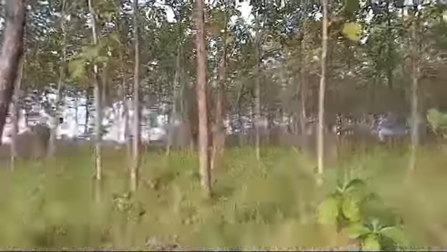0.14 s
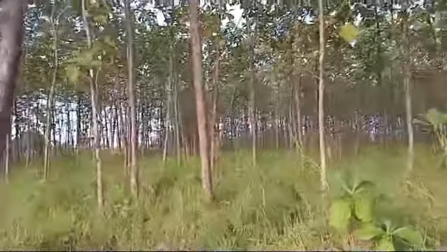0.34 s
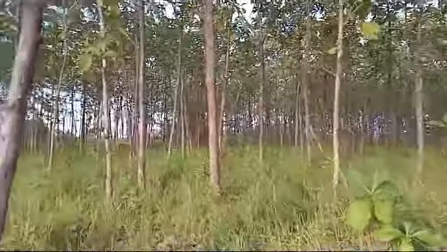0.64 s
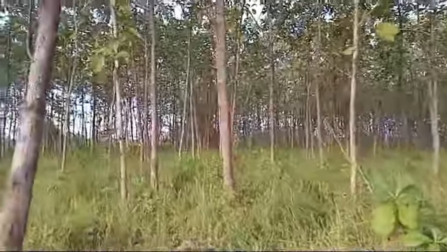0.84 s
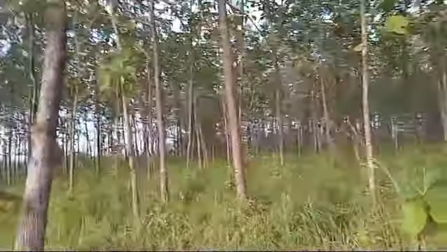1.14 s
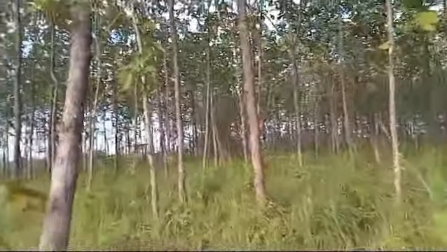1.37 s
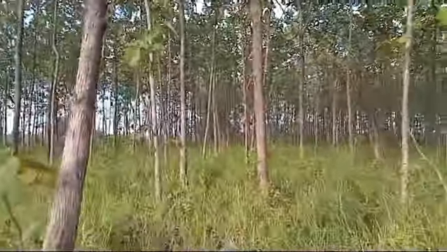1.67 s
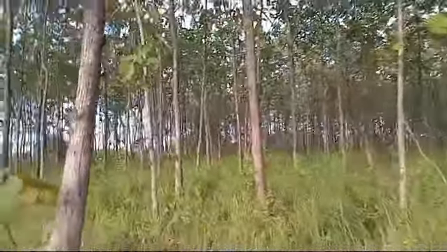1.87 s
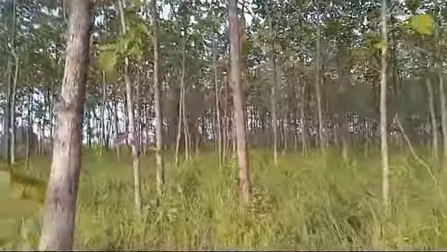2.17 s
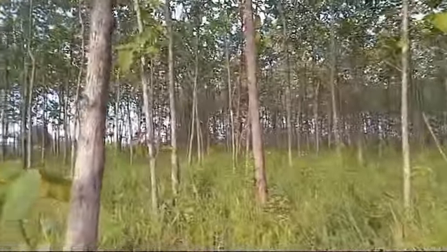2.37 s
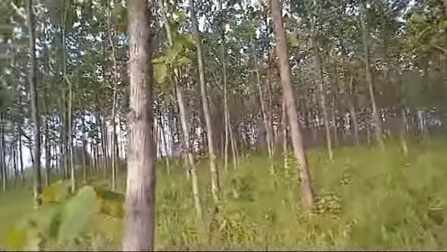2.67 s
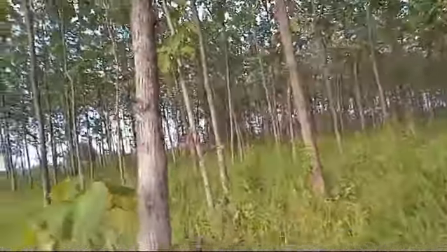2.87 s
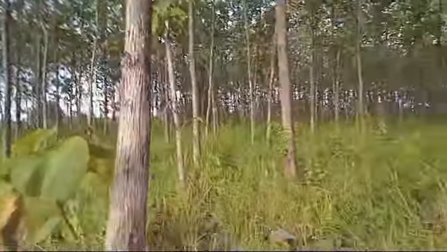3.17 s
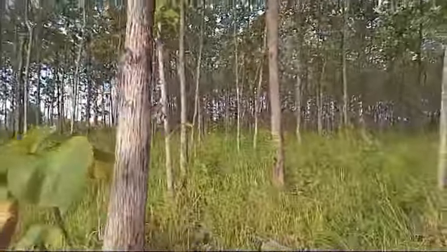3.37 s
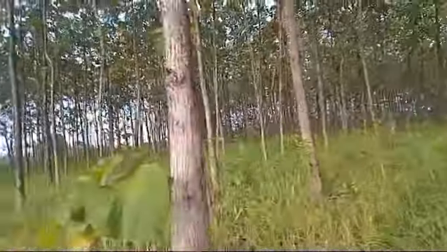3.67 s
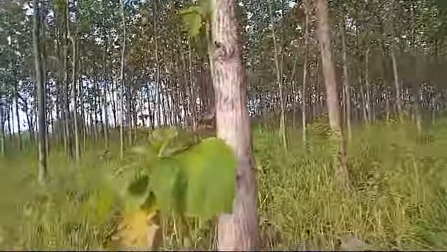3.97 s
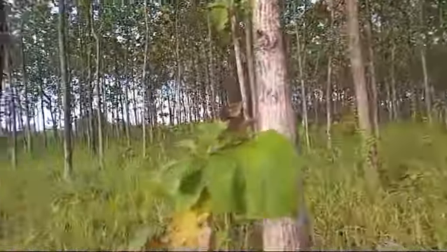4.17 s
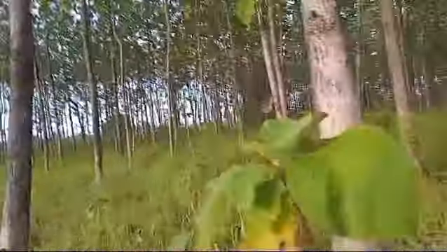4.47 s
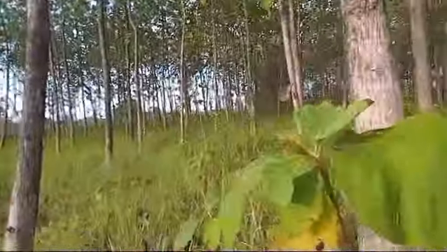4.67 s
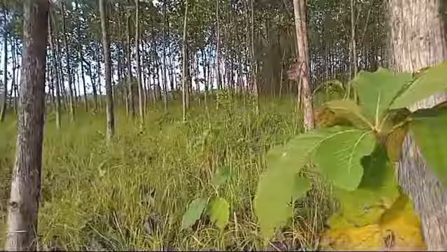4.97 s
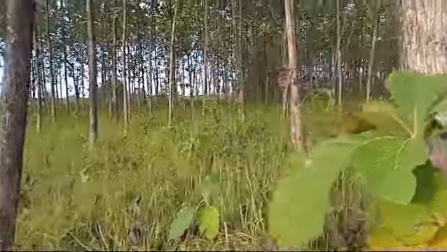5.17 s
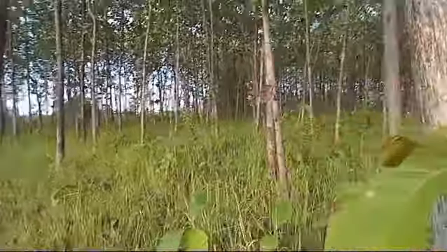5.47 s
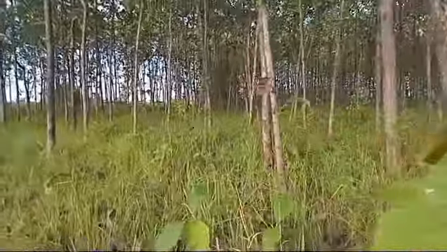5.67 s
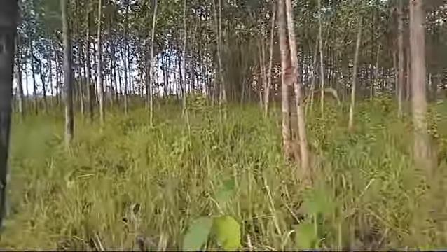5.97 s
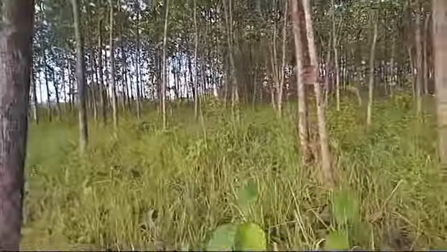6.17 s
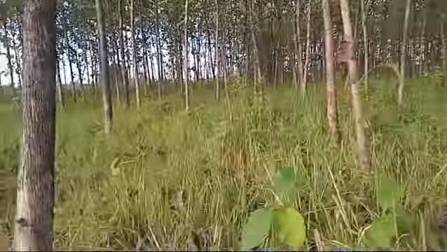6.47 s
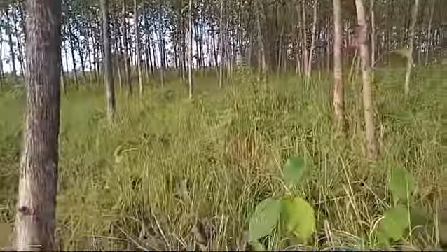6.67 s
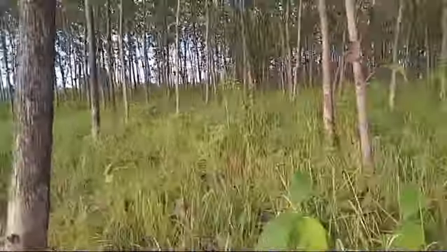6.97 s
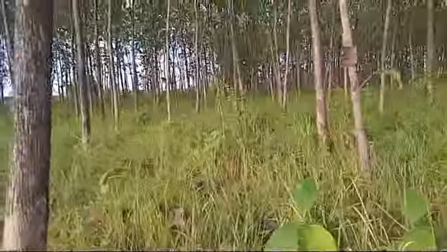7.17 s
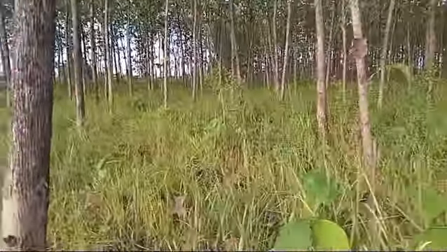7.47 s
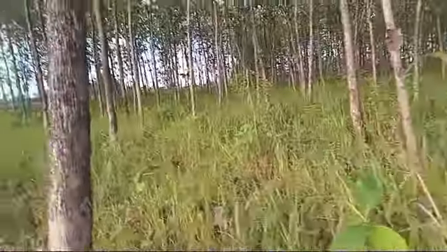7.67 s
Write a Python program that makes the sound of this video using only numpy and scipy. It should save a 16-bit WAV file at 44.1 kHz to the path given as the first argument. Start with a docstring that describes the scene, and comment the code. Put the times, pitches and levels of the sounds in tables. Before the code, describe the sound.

Outdoors among thin trees, small birds give falling whistles and harsh short chirps, softened by woodland echo. Near the microphone, legs sweep dry grass: light rustles at first, a sharp crackling footfall on dead leaves, a woody snap, then soft thuds and a final brittle crunch. Tiny dry insect ticks appear now and then. Gusts make a deep, dull rumble that eases later, with faint high hiss beneath.

```python
"""Slow steps through long dry grass in a young wood: each swish is a mass of tiny fractures over sliding hiss.
Single stems, crushed leaves and a twig break as bursts of noise, some ringing through short damped modes.
Small birds call in gliding sine tones with rough side tones, and a wash of echoes spreads among the trunks.
Dry insect ticks are bursts of filtered noise; a faint drone comes and goes, wind rumbles on the microphone,
and a faint high hiss around 9.5-11 kHz, probably the microphone's own noise, lies beneath."""
import sys
import numpy as np
from scipy import signal
from scipy.fft import rfft, irfft, next_fast_len
from scipy.io import wavfile
from scipy.ndimage import uniform_filter1d

SR = 44100
rng = np.random.default_rng(int(sys.argv[2]) if len(sys.argv) > 2 else 0)


def wav_out(sig):
    """Save sig, one row per channel (or a flat mono array), as 16-bit PCM at SR to the path in sys.argv[1]."""
    wavfile.write(sys.argv[1], SR, np.round(np.clip(np.atleast_2d(sig).T, -1, 1) * 32767).astype(np.int16))


N = 345303
T = np.arange(N) / SR


def undb(db):
    """Decibels to amplitude gain."""
    return 10 ** (np.asarray(db) / 20)


def unit(x):
    """Scale to rms 1."""
    return x / np.sqrt(np.mean(x ** 2) + 1e-30)


def unit_burst(x):
    """Scale a short sound to the energy of 4 ms at rms 1."""
    return x / np.sqrt(np.sum(x ** 2) / (.004 * SR))


def curve(points):
    """Draw straight lines over time through (time, value) points."""
    return np.interp(T, *np.transpose(points))


def add(out, start_s, x):
    """Mix x into out at start_s."""
    i = max(int(start_s * SR), 0)
    out[i:i + len(x)] += x[:max(N - i, 0)]


def colour(x, points):
    """Causal, minimum-phase filter through (Hz, dB) points; white noise keeps its power."""
    hz, db = np.transpose(points)
    size = 8192
    bins_hz = np.fft.rfftfreq(size, 1 / SR)
    gain = unit(undb(np.interp(np.log(bins_hz + 1), np.log(hz), db)))
    # folding the cepstrum forward puts the whole response after the input
    cepstrum = irfft(np.log(gain))
    cepstrum[1:size // 2] *= 2
    cepstrum[size // 2 + 1:] = 0
    return signal.fftconvolve(x, irfft(np.exp(rfft(cepstrum))))[:N]


def walk(rate_hz):
    """Random wander through rate_hz new values a second, with spread near 1."""
    knots = rng.standard_normal(8192)
    return np.interp(T * rate_hz, np.arange(len(knots)), knots)


def burst(decay_s, tail_db=-60, tail_s=0.014):
    """A fracture: a sharp flurry of noise, then weaker splinters of random strength."""
    t = T[:SR // 8]
    splinter_times = t[::40]
    splinter_sizes = rng.exponential(size=len(splinter_times)) ** 1.5 / 2
    splinters = np.interp(t, splinter_times, splinter_sizes)
    force = np.exp(-t / decay_s) + undb(tail_db) * splinters * np.exp(-t / tail_s)
    return unit_burst(rng.standard_normal(len(t)) * force)


def ring(hz, width_hz):
    """A damped mode with gain 1 at its centre."""
    t = T[:SR // 8]
    decay = np.exp(-np.pi * width_hz * t)
    return 2 * np.pi * width_hz / SR * decay * np.sin(2 * np.pi * hz * t)


# balance of sliding hiss against breaking stalks: time_s, hiss_over_crackle_power [ratio]
SLIDE_BALANCE = [(0, 1.4), (3.4, 1.1), (5.5, 0.67), (5.9, 2.7), (6.8, 4.4), (7.2, 21), (7.5, 5.2),
                 (7.65, 4.5), (7.8, 1.8)]
# gain of the swishes' treble above 9 kHz: time_s, gain_db
TREBLE_GAIN = [(0.8, 2), (1.8, -0.5), (3.4, 0.5), (4.2, 4), (5.2, -2), (6.85, 12), (7.3, 4), (7.47, -21),
               (7.55, -6.5)]
# crisp tone of breaking stalks: frequency_hz, relative_level_db [dB per Hz]
CRACKLE_COLOUR = [(1200, -21), (2400, -4.5), (3300, 0.5), (5000, 0.5), (6500, 0.5), (7900, -2), (9800, 7.5),
                  (11100, 3), (11800, -5), (15500, -13)]
# hollow tone of crushed litter: frequency_hz, relative_level_db [dB per Hz]
LITTER_COLOUR = [(150, -26.5), (350, -21), (550, -22.5), (800, -5.5), (1150, 0.5), (1900, 2.5), (2800, 1),
                 (5000, -22.5)]


def grass(per_s=420, patchy_db=4.0, leaf_db=6.5, crackle_db=-3.0, litter_db=-3.5):
    """Stalks break in tiny flurries of very unequal size and set leaves ringing, over the hiss of sliding blades."""
    spread_db, grain_s, rings_db = 4.5, .0009, -3
    sizes_db = spread_db * np.minimum(rng.exponential(size=N), 3.5)
    breaks = (rng.random(N) < per_s / SR) * undb(sizes_db)
    slide = curve(SLIDE_BALANCE)
    # the more the blades slide, the smoother the texture
    smooth = np.sqrt(1 + slide)
    clumps = undb(patchy_db * walk(70) / smooth)
    rings = undb(rings_db) * leaf_rings() / smooth
    out = 0
    for layer, trim_db, points in (("crackle", crackle_db, CRACKLE_COLOUR), ("litter", litter_db, LITTER_COLOUR)):
        # every break has its own balance of crisp and hollow
        hits = breaks * undb(2 * rng.standard_normal(N))
        power = signal.lfilter([1], [1, -np.exp(-2 / (grain_s * SR))], hits ** 2)
        force = np.sqrt((power / power.mean() + slide) / (1 + slide))
        texture = force * leaves(leaf_db / smooth) + rings
        out = out + colour(texture * clumps * swish_gain(layer) * undb(trim_db), points)
    treble = signal.sosfiltfilt(signal.butter(2, 9000, "high", fs=SR, output="sos"), out)
    return out + treble * (undb(curve(TREBLE_GAIN)) - 1)


# a leg or foot sweeps the grass; levels are relative, the litter's is for below 2.4 kHz:
# start_s, attack_s, length_s, crackle_level_db, litter_level_db
SWISHES = [(0.033, 0.011, 0.16, -72, -76.5), (0.736, 0.03, 0.061, -45.5, -62.5),
           (0.806, .01, 0.083, -46.5, -58), (0.923, .015, 0.13, -59, -78.5),
           (1.741, 0.015, 0.093, -49.5, -65.5), (2.001, 0.019, 0.036, -49, -66),
           (2.596, 0.014, 0.16, -60, -76), (3.276, 0.013, 0.14, -51, -57.5),
           (3.374, 0.0068, 0.11, -41.5, -45.5), (3.528, 0.017, 0.1, -59.5, -67.5),
           (3.666, 0.008, 0.043, -59, -67), (3.987, 0.018, 0.066, -59, -88),
           (4.067, 0.0098, 0.063, -50, -58.5), (4.161, 0.02, 0.072, -50, -52.5),
           (4.257, 0.0043, 0.054, -50.5, -61.5), (4.415, .012, 0.062, -60.5, -61),
           (4.533, 0.028, 0.12, -66.5, -74), (4.961, 0.033, 0.045, -64, -85),
           (5.145, 0.011, 0.068, -52.5, -66.5), (5.528, 0.0074, 0.02, -62, -66.5),
           (5.812, 0.06, 0.13, -64.5, -70), (5.977, 0.016, 0.18, -72, -74),
           (6.775, 0.0025, 0.099, -51, -55), (7.071, 0.023, 0.12, -61.5, -56), (7.143, 0.02, 0.1, -50, -58),
           (7.249, 0.013, 0.074, -48.5, -59), (7.362, 0.016, 0.059, -52.5, -72),
           (7.414, 0.015, 0.087, -46, -73), (7.524, 0.0053, 0.055, -32, -42),
           (7.599, 0.01, 0.048, -39, -45), (7.674, 0.016, 0.13, -54.5, -82)]


def swish_gain(layer, arch_db=1, settle_s=0.024):
    """Strength of the swishes in one layer; each builds, swells and dies away as the stalks settle."""
    power, lead_s = np.zeros(N), .03
    t = T[:SR] - lead_s
    for start_s, attack_s, length_s, crackle_db, litter_db in SWISHES:
        level_db = crackle_db if layer == "crackle" else litter_db
        attack = (1 + np.tanh(t / attack_s - .5)) / 2
        swell_db = arch_db * (np.sin(np.pi * np.clip(t / length_s, 0, 1)) - .5)
        settle = np.exp(-np.maximum(t - length_s, 0) / settle_s)
        add(power, start_s - lead_s, (undb(level_db + swell_db) * attack * settle) ** 2)
    return np.sqrt(power)


def leaves(spread_db):
    """Noise whose bands flicker apart, as one leaf after another rings at its own pitch."""
    size = next_fast_len(N)
    spectrum, hz = rfft(rng.standard_normal(size)), np.fft.rfftfreq(size, 1 / SR)
    band = np.searchsorted(np.geomspace(600, 13000, 20), hz)
    out = np.zeros(N)
    for k in range(band.max() + 1):
        band_noise = irfft(spectrum * (band == k), size)[:N]
        out += band_noise * undb(spread_db * walk(45))
    return unit(out)


def leaf_rings():
    """Curled dry leaves ring for a few milliseconds, each at its own pitch and strength."""
    per_s, width_hz, spread_db = 800, 240, 5
    out, t = np.zeros(N), T[:SR // 60]
    for when, pitch, damping, size in rng.random((int(per_s * N / SR), 4)):
        hz = 800 * 9 ** pitch
        level_db = spread_db * min(-np.log(1 - size), 3)
        decay = np.exp(-np.pi * width_hz * (.5 + damping) * t)
        add(out, when * N / SR, undb(level_db) * decay * np.sin(2 * np.pi * hz * t))
    return unit(out)


# dull brush of long blades along a leg: frequency_hz, relative_level_db [dB per Hz]
BRUSH_COLOUR = [(200, -32.5), (400, -1), (650, 6.5), (1000, -3), (1600, -19), (3000, -37)]


def brush(trim_db=-6):
    """Where the blades slide rather than break, they rub the leg with a soft, low hiss."""
    slide = curve(SLIDE_BALANCE)
    rubbing = swish_gain("litter") * (slide / (1 + slide)) ** 2
    return colour(rng.standard_normal(N) * rubbing, BRUSH_COLOUR) * undb(trim_db)


# how much bent grass goes on stirring between steps: time_s, level_db
STIRRING = [(0, -81.5), (1.3, -75), (2.3, -85.5), (3.1, -83.5), (3.9, -84.5), (4.7, -73), (5.6, -83),
            (6.5, -75), (7.83, -64.5)]


def stirring(leaf_db=8.5, waver_db=5.0):
    """Between the steps, bent stalks creep back with a faint, soft rustle."""
    strength = undb(curve(STIRRING) + waver_db * walk(13))
    return colour(leaves(leaf_db) * strength, CRACKLE_COLOUR)


# single stems and leaves breaking, about 1 ms after cue_s: cue_s, relative_treble_db, relative_body_db
SNAPS = [(0.049, -65, -56), (0.2534, -52, -47.5), (0.757, -46, -56), (0.8105, -37.5, -43),
         (0.9008, -41, -58), (1.3395, -45.5, -50.5), (1.7419, -38.5, -62), (1.7813, -34.5, -40),
         (1.8292, -30.5, -47), (2.644, -53, -53.5), (2.712, -41, -75), (3.3882, -29, -30),
         (3.393, -24.5, -45), (3.3998, -25, -26), (3.4135, -17, -26), (3.4319, -27, -42),
         (3.4476, -28, -29), (3.46, -37, -48), (3.4743, -37, -32), (3.491, -31, -51), (3.5132, -37, -44),
         (3.595, -38, -41.5), (3.613, -44, -47), (3.6772, -45.5, -73), (4.024, -47, -68),
         (4.0805, -38, -52), (4.0869, -31.5, -52), (4.194, -38, -47), (4.993, -46, -76),
         (5.342, -54.5, -52), (5.535, -53, -50), (6.105, -49.5, -65), (6.8781, -43, -40),
         (7.0308, -49.5, -59), (7.388, -50, -70), (7.5268, -28.5, -35), (7.605, -43, -36),
         (7.623, -38, -40), (7.628, -32, -47), (7.647, -27, -39), (7.733, -41.5, -75), (7.7627, -44.5, -74),
         (7.7844, -37, -68)]
# whole dry leaves crushed flat: start_s, length_s, treble_level_db, body_level_db
CRUSHES = [(1.819, 0.011, -52.5, -50.5), (2.025, 0.0019, -45, -47), (3.384, 0.0082, -30.5, -31.5),
           (3.392, 0.018, -31, -38.5), (3.411, 0.0031, -26, -32), (3.419, 0.0047, -32.5, -39),
           (3.448, 0.0068, -36, -34), (4.074, 0.039, -46, -54.5), (4.432, 0.031, -78, -60),
           (6.879, 0.073, -49.5, -62), (6.935, 0.024, -58, -58.5), (7.444, 0.022, -62, -62.5),
           (7.532, 0.02, -42, -37.5), (7.568, 0.016, -33, -36.5)]


def snaps(crisp_db=-7, body_db=-9):
    """Thicker stems give way one by one; stiff leaves collapse in a dense run of fractures."""
    crisp, body = np.zeros(N), np.zeros(N)
    for cue_s, treble_db, low_db in SNAPS:
        tick = burst(.001, tail_db=-13, tail_s=.008)
        tock = burst(.0015, tail_db=-13, tail_s=.01)
        add(crisp, cue_s + 0.00088, undb(treble_db + crisp_db) * stem(tick))
        add(body, cue_s + 0.001128, undb(low_db + body_db) * stem(tock))
    for start_s, length_s, treble_db, low_db in CRUSHES:
        u = np.linspace(0, 1, int(length_s * SR))
        arch = np.sqrt(np.abs(np.sin(np.pi * u)))
        force = unit(arch * undb(3 * walk(900)[:len(u)]))
        add(crisp, start_s, undb(treble_db) * force * rng.standard_normal(len(u)))
        add(body, start_s, undb(low_db) * force * rng.standard_normal(len(u)))
    return colour(crisp, CRACKLE_COLOUR) + colour(body, LITTER_COLOUR)


def stem(x):
    """Every stem rings with its own chance colour."""
    hz, spread_db = np.geomspace(700, 15000, 16), 3
    return colour(x, np.transpose([hz, spread_db * rng.standard_normal(len(hz))]))


# thin dry blades flick past each other: start_s, resonance_hz, width_hz, level_db
FLICKS = [(0.047, 11500, 6800, -48.5), (0.737, 9300, 1000, -46), (0.832, 12000, 6000, -40),
          (0.9675, 10150, 1200, -46), (2.871, 11700, 6700, -56), (6.857, 10400, 1800, -39)]


def flicks():
    """Each flick is a brief scrape through the blade's one high resonance."""
    out = np.zeros(N)
    for start_s, hz, width_hz, level_db in FLICKS:
        mode = ring(hz, width_hz)
        scrape = burst(.0018, tail_db=-16)
        x = signal.fftconvolve(signal.fftconvolve(scrape, mode), mode)
        add(out, start_s, undb(level_db) * unit_burst(x))
    return out


# a twig breaks underfoot: start_s, level_db
TWIG_CRACKS = [(4.2666, -24.5), (4.2692, -47.5), (4.2687, -45.5)]
# what the twig rings with: frequency_hz, width_hz, relative_level_db
TWIG_MODES = [(637, 244, -6.5), (970, 400, -1.5), (1500, 390, 2), (3150, 390, 3), (4430, 1860, -6),
              (8900, 5100, -6), (11500, 1570, -1)]


def twig(scatter_db=-27):
    """The twig splits in stages; each one rings its short modes and shakes the litter."""
    out, crack = np.zeros(N), 0
    for k, (hz, width_hz, mode_db) in enumerate(TWIG_MODES):
        # neighbouring modes swing in opposite directions
        crack = crack + (-1) ** k * undb(mode_db) * ring(hz, width_hz)
    crack = unit_burst(crack)
    for start_s, level_db in TWIG_CRACKS:
        add(out, start_s, undb(level_db) * crack)
    scatter = burst(decay_s=0.0035)
    return out + undb(scatter_db) * signal.fftconvolve(out, scatter)[:N]


# dull knocks of a foot on wood and soil: start_s, resonance_hz, scuff_decay_s, relative_level_db
KNOCKS = [(5.535, 660, 0.011, -47.5), (5.925, 865, 0.0059, -63.5), (6.815, 153.4, 0.032, -38.5),
          (6.84, 270, 0.0076, -48.5), (6.945, 730, 0.011, -54)]


def knocks(width=0.44):
    """Soft blows: a brief scuff through one broad, low resonance, its width a share of its pitch."""
    out = np.zeros(N)
    for start_s, hz, decay_s, level_db in KNOCKS:
        mode = ring(hz, width * hz)
        x = signal.fftconvolve(signal.fftconvolve(burst(decay_s), mode), mode)
        add(out, start_s, undb(level_db) * 2 * x / np.abs(x).max())
    return out


# Call tables below: start_s, length_s, pitch_hz, level_db, side_tones_db.
# The arches scale pitch_hz and the swells scale the level; each is one column of ratios at five even moments.
# falling whistles: columns as above
WHISTLES = [(0.213, 0.12, 2990, -73, -20), (0.371, 0.16, 3230, -72, -14), (0.695, 0.12, 3370, -62, -24),
            (1.005, 0.12, 3386, -57.5, -3), (1.32, 0.093, 3440, -61.5, -17), (1.621, 0.1, 3496, -60.5, -11),
            (1.924, 0.096, 3530, -60, -32), (2.248, 0.095, 3400, -62, -36), (2.675, 0.1, 3235, -66, -4),
            (2.72, 0.088, 2890, -60.5, -16), (3.521, 0.10, 3362, -59.5, -6.5),
            (3.802, 0.1, 3060, -62.5, -7), (4.494, 0.11, 3335, -62.5, -13), (4.81, 0.13, 3303, -65, -23.5),
            (5.115, 0.11, 3290, -62.5, -13), (5.25, 0.16, 2890, -67.5, -14), (5.444, 0.086, 3254, -66, -29),
            (6.282, .12, 3174, -67.5, -22.5), (6.6, 0.12, 3240, -77.5, -12), (6.88, 0.11, 3340, -61.5, -12),
            (7.25, 0.065, 3090, -60.5, -19), (7.69, .13, 3300, -82, -1)]
# height over the lowest pitch: share_of_height [ratio]; strength: gain [ratio]
WHISTLE_ARCH = [.96, 1.01, .89, 0.48, .28]
WHISTLE_SWELL = [.45, 0.84, .85, .62, 0.53]
WHISTLE_LOWEST_HZ = 2646
# harsh chirps that slide up, hold and dip at the end: columns as above
CHIRPS = [(1.36, 0.049, 3330, -65.5, 0.5), (2.929, 0.063, 3377, -54.5, -5),
          (3.203, 0.057, 3420, -58.5, -3.5), (3.875, 0.063, 3270, -61.5, -10),
          (5.495, 0.053, 3350, -59, -5), (5.783, 0.046, 3418, -57.5, -5.5),
          (6.087, 0.046, 3347, -60.5, -2.5), (6.38, 0.065, 3250, -63, -0.5),
          (6.69, 0.061, 3430, -67.5, 2.5), (7.0, 0.06, 3250, -73, -3), (7.36, 0.14, 3150, -67, -3.5)]
# pitch_scale [ratio]; gain [ratio]
CHIRP_ARCH = [0.79, .91, 1.0, 1.003, 0.89]
CHIRP_SWELL = [0.27, 0.33, 0.99, 0.89, .5]
# thin, clean calls high in the canopy: columns as above
THIN_CALLS = [(1.09, 0.25, 6980, -67.5, -43), (4.53, 0.21, 6900, -69, -46), (4.78, 0.097, 5150, -81, -46)]
# pitch_scale [ratio]; gain [ratio]
THIN_ARCH = [.965, 0.91, 1.002, 0.89, .996]
THIN_SWELL = [0.47, 0.65, 0.68, 0.74, .3]
# clear, sinking notes from nearer birds: columns as above
CLEAR_CALLS = [(2.41, 0.1, 4090, -59, -39), (1.385, 0.043, 6550, -85, -45), (5.39, .13, 5800, -80, -46)]
# pitch_scale [ratio]; gain [ratio]
CLEAR_ARCH = [.965, 1.006, .978, .955, .925]
CLEAR_SWELL = [.5, 0.77, 0.71, 0.41, .12]


def birds(notes, arch, swell, lowest_hz=0, octave_db=-31, second_voice_db=-4):
    """Gliding notes; harsh ones gain side tones and a lower, less steady voice from the syrinx's other side."""
    out, wobble, waver, flutter = np.zeros(N), walk(400), walk(300), walk(90)
    moments, lower = np.linspace(0, 1, len(arch)), .885
    for start_s, length_s, hz, level_db, side_db in notes:
        u = np.linspace(0, 1, int(length_s * SR))
        here = int(start_s * SR) + np.arange(len(u))
        harsh = undb(side_db)
        bend = uniform_filter1d(np.interp(u, moments, arch), len(u) // 6)
        glide_hz = lowest_hz + (hz - lowest_hz) * bend
        # harsh notes are rougher, and low notes lose steadiness towards the end
        rough = .003 + .014 * harsh + .035 * u ** 2 * (hz < 3800)
        phase = 2 * np.pi * np.cumsum(glide_hz * (1 + rough * wobble[here])) / SR
        second = 2 * np.pi * np.cumsum(lower * hz * (1 + .03 * waver[here])) / SR
        # a slower vibration puts side tones mainly a quarter of the pitch away
        sides = np.sin(5 / 4 * phase) + .1 * np.sin(3 / 4 * phase) + .06 * np.sin(7 / 4 * phase)
        sides += .06 * np.sin(phase / 2) + .12 * np.sin(2 * phase)
        second_voice = np.sin(second) + np.sin(5 / 4 * second) / 2
        force = np.interp(u, moments, swell) * np.interp(u, [0, .1, .9, 1], [0, 1, 1, 0])
        voice = np.sin(phase) + undb(octave_db) * np.sin(2 * phase)
        voice += harsh * force ** 2 * sides + undb(second_voice_db) * harsh * second_voice
        add(out, start_s, np.sqrt(2) * force * undb(2 * flutter[here] + level_db) * voice)
    return out


# falling, trilled notes that end some whistles: start_s, length_s, pitch_hz, level_db
BUZZES = [(0.499, 0.064, 3156, -58.5), (1.055, 0.085, 3240, -60.5), (1.362, 0.068, 3150, -66),
          (1.664, 0.069, 2880, -66)]


def buzzes(trill_hz=340, depth=0.059, rough=0.018, fall=.1):
    """A fast, uneven trill shakes the falling pitch and splits the note into close strands."""
    out, wobble, waver = np.zeros(N), walk(700), walk(60)
    for start_s, length_s, hz, level_db in BUZZES:
        u = np.linspace(0, 1, int(length_s * SR))
        here = int(start_s * SR) + np.arange(len(u))
        trill = np.sin(2 * np.pi * np.cumsum(trill_hz * (1 + .1 * waver[here])) / SR)
        bend = 1 - fall * u ** 2 + depth * trill + rough * wobble[here]
        phase = 2 * np.pi * np.cumsum(hz * bend) / SR
        swell = np.sqrt(2) * np.sin(np.pi * np.sqrt(u))
        add(out, start_s, undb(level_db) * swell * np.sin(phase))
    return out


# short low pips of another bird: start_s, peak_level_db, pitch_hz
PIPS = [(1.153, -62, 1500), (1.27, -61, 1360), (1.3356, -49.5, 1657), (1.432, -63, 1500),
        (1.944, -55.5, 1500), (2.319, -63.5, 1500), (2.64, -58.5, 1556), (2.75, -51, 1500),
        (4.35, -60, 1600), (4.683, -59.5, 1422), (5.08, -65.5, 1470)]


def pips(length_s=0.011, rough=0.062):
    """Very short, low notes, husky because their pitch shakes at random."""
    out, u, wobble = np.zeros(N), np.linspace(0, 1, int(length_s * SR)), walk(900)
    for start_s, level_db, hz in PIPS:
        shake = rough * wobble[int(start_s * SR):][:len(u)]
        phase = 2 * np.pi * np.cumsum(hz * (1 + shake)) / SR
        add(out, start_s, undb(level_db) * np.sin(np.pi * u) ** 2 * np.sin(phase))
    return out


def trunks(x):
    """Scattering among the trees: a dense, slightly uneven wash of echoes builds up and fades."""
    t60_s, buildup_s, clump_db = .5, .014, 1.5
    t = T[:SR]
    fade = undb(-60 * t / t60_s + clump_db * walk(60)[:SR])
    buildup = 1 - np.exp(-(t / buildup_s) ** 2)
    tail = rng.standard_normal(SR) * fade * buildup
    return signal.fftconvolve(x, tail / np.sqrt(np.sum(tail ** 2)))[:N]


# thin high ticks, likely an insect, about 1 ms after cue_s: cue_s, relative_level_db
TICKS = [(1.2516, -51.5), (1.312, -47.5), (1.469, -50), (1.54, -50), (1.5603, -44), (4.4044, -53),
         (4.46, -53), (4.5516, -51.5), (4.636, -59), (4.725, -60), (6.2447, -50.5), (6.552, -52),
         (6.637, -53), (6.713, -50.5), (6.739, -45.5)]


def insect_ticks(tick_db=-4.5):
    """Dry insect ticks close by: short noise bursts through a peak near 9.8 kHz."""
    ticks = np.zeros(N)
    for cue_s, level_db in TICKS:
        tick = burst(decay_s=0.0014, tail_db=-12.5, tail_s=0.02)
        add(ticks, cue_s + 0.00094, undb(level_db + tick_db) * tick)
    return colour(ticks, [(2000, -15.5), (6500, -17.0), (8700, -2.5), (9800, 8.5),
                          (11000, -8), (12500, -27), (16000, -36)])


# a faint, far drone: time_s, level_db
DRONE = [(0, -79.5), (0.3, -77), (0.6, -91), (5.6, -94.5), (6.0, -84.5), (6.7, -80), (7.83, -80)]


def drone(hz=620, width_hz=130):
    """A narrow band of distant noise that comes and goes."""
    band = signal.fftconvolve(rng.standard_normal(N), ring(hz, width_hz))[:N]
    return unit(band) * undb(curve(DRONE))


# slow strength of the breeze on the microphone: time_s, level_db
BREEZE = [(0, -52), (0.3, -47.5), (1.0, -43.5), (1.5, -49), (1.9, -42.5), (2.2, -48.5), (2.5, -38.5),
          (2.95, -46), (3.3, -38.5), (3.7, -39.5), (4.1, -43), (4.55, -49.5), (5.1, -42), (5.35, -56),
          (6.05, -66), (6.3, -59.5), (6.6, -51.5), (7.83, -62)]
# single gusts that stand out from the breeze: peak_s, level_db
GUSTS = [(0.50, -41.5), (0.75, -40), (1.089, -35.5), (1.659, -37.5), (1.79, -41), (2.03, -36.5),
         (2.361, -38.5), (2.68, -40), (3.10, -39.5), (4.33, -40.5), (4.68, -45), (5.442, -50.5),
         (5.611, -45), (5.88, -52), (6.149, -51), (6.48, -42), (6.838, -41.5), (6.98, -44), (7.71, -45.5)]
# tone of the buffeting: frequency_hz, relative_level_db [dB per Hz]
WIND_COLOUR = [(15, -9.5), (28, -2), (45, 3), (65, 5.5), (90, 0.5), (122, 0.5), (160, -11.5), (200, -19.5),
               (260, -37.5), (400, -51), (800, -72)]
# tone of the wood's hush: frequency_hz, relative_level_db [dB per Hz]
AIR_COLOUR = [(200, 8.5), (400, 1.5), (650, -5), (1000, -8.5), (2200, -8.5), (3000, -16), (4200, -13),
              (5200, -15), (6500, -18), (8500, -21), (12000, -24.5), (16000, -27.5)]


def wind(air_db=-76, full_db=-43, deepen=0.8, flutter_db=3.5, gust_width_s=0.031):
    """Eddies buffet the microphone, the stronger the deeper, over the soft hush of the wood."""
    breeze = undb(curve(BREEZE) + flutter_db * walk(14))
    gusts = sum(undb(db) ** 2 * np.exp(-((T - peak_s) / gust_width_s) ** 2) for peak_s, db in GUSTS)
    gust_db = 10 * np.log10(breeze ** 2 + gusts)
    eddies = unit(colour(rng.standard_normal(N), WIND_COLOUR))
    # below 85 Hz the rumble grows faster than the gust
    deep = signal.sosfiltfilt(signal.butter(2, 85, fs=SR, output="sos"), eddies)
    eddies = eddies + deep * (undb(deepen * (gust_db - full_db)) - 1)
    # even out the eddies' own swells, so the gusts mainly set the strength
    eddies = eddies / np.sqrt(uniform_filter1d(eddies ** 2, SR // 16) + 0.028)
    hush = colour(rng.standard_normal(N), AIR_COLOUR) * undb(air_db + .7 * walk(2.2))
    return eddies * undb(gust_db) + hush


# tone of the faint high hiss: frequency_hz, relative_level_db [dB per Hz]
HISS_COLOUR = [(6000, -43), (8500, -22), (9400, -4), (9900, -3.5), (10700, 1.5), (11100, -7),
               (11500, -20.5), (13000, -41)]


def high_hiss(hiss_db=-82):
    """A faint, steady high hiss around 9.5-11 kHz, probably the microphone's own noise; its level wavers slightly."""
    return colour(rng.standard_normal(N), HISS_COLOUR) * undb(hiss_db + 2.0 * walk(23))


def scene(song_echo_db=-1.47, near_echo_db=-16, step_echo_db=-32):
    """Steps close by, birds further off among the trunks, insect ticks, drone, wind and a high hiss."""
    steps = grass() + brush() + stirring() + snaps() + flicks() + twig() + knocks()
    whistles = birds(WHISTLES, WHISTLE_ARCH, WHISTLE_SWELL, WHISTLE_LOWEST_HZ)
    chirps = birds(CHIRPS, CHIRP_ARCH, CHIRP_SWELL)
    far_song = whistles + chirps + buzzes()
    thin_calls = birds(THIN_CALLS, THIN_ARCH, THIN_SWELL)
    clear_calls = birds(CLEAR_CALLS, CLEAR_ARCH, CLEAR_SWELL)
    near_song = thin_calls + clear_calls + pips()
    # the foliage soaks up the highest notes before they scatter back
    scattered = signal.sosfilt(signal.butter(2, 5000, fs=SR, output="sos"), far_song)
    echo_feed = undb(song_echo_db) * scattered + undb(near_echo_db) * near_song + undb(step_echo_db) * steps
    background = insect_ticks() + drone() + wind() + high_hiss()
    return (steps + far_song + near_song + trunks(echo_feed) + background)[None]


def record(dry, top_hz=15900):
    """The recorder cuts the top steeply above top_hz."""
    return signal.sosfilt(signal.ellip(8, .2, 70, top_hz, fs=SR, output="sos"), dry)


dry = scene()
out = record(dry)
wav_out(out)
```